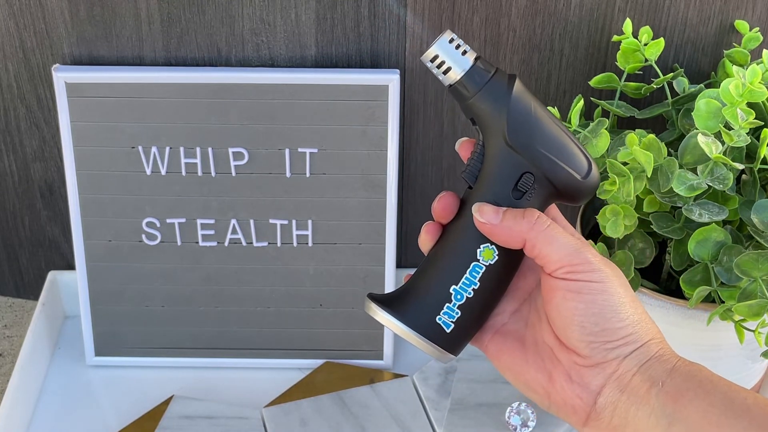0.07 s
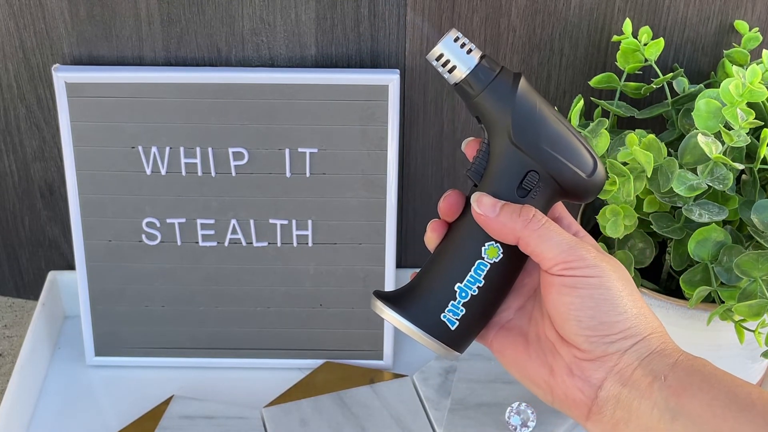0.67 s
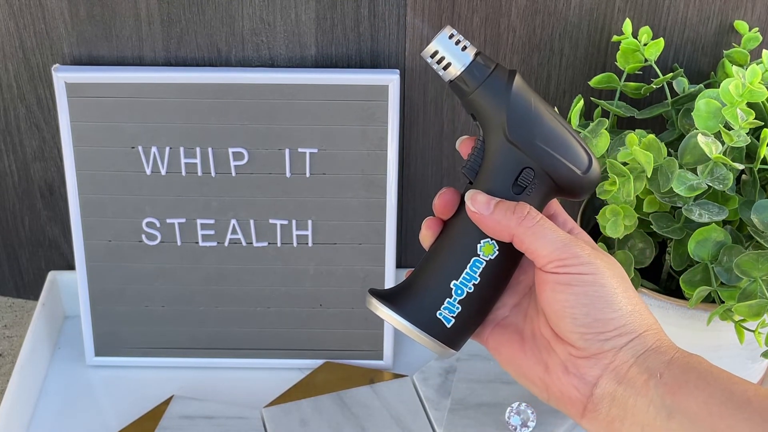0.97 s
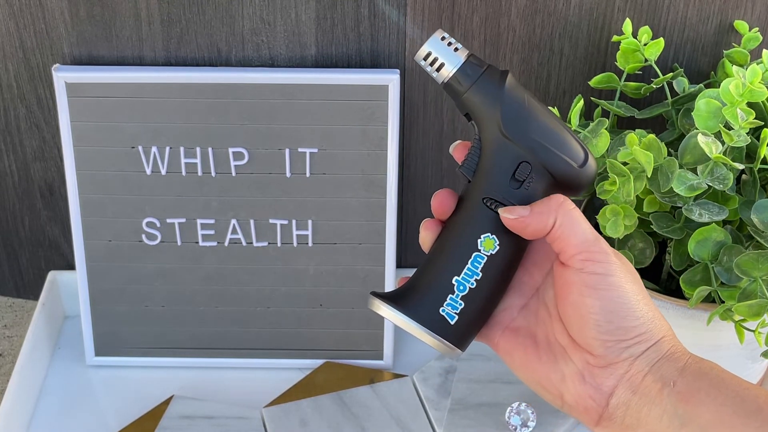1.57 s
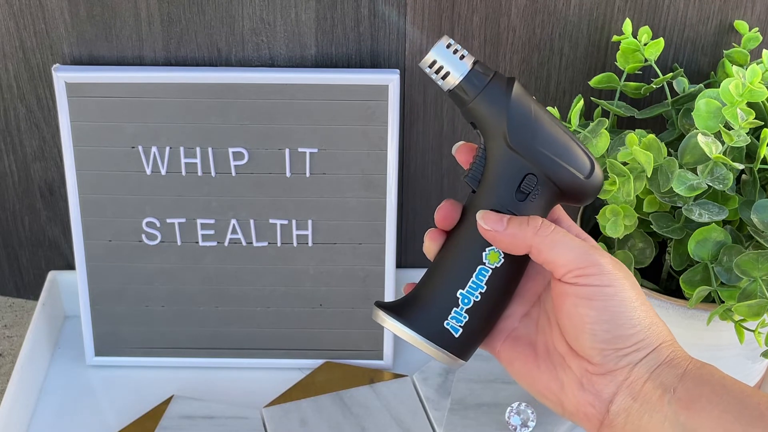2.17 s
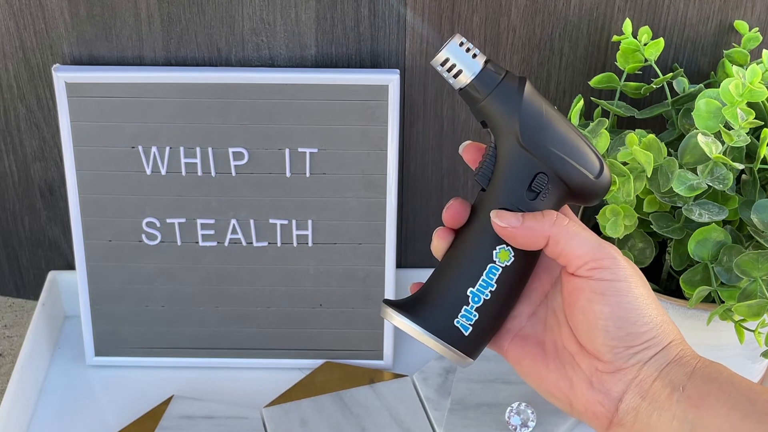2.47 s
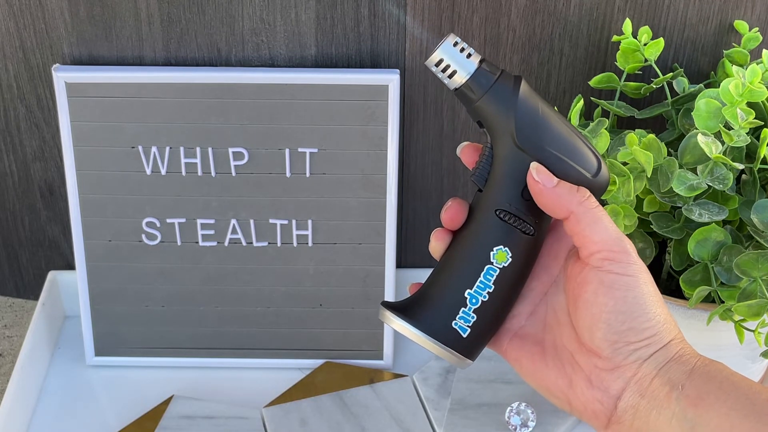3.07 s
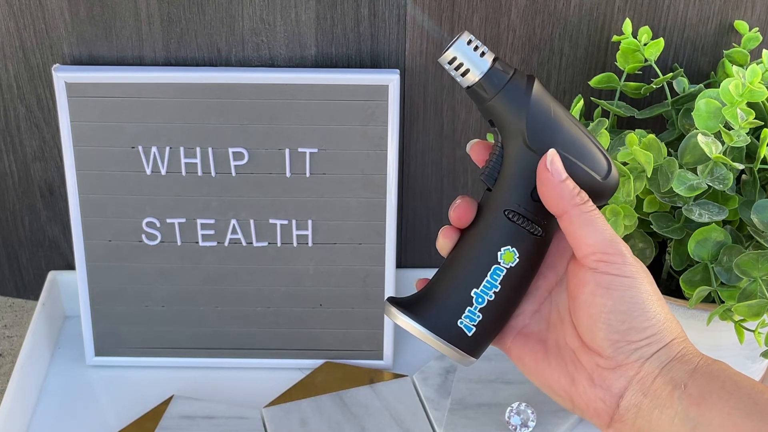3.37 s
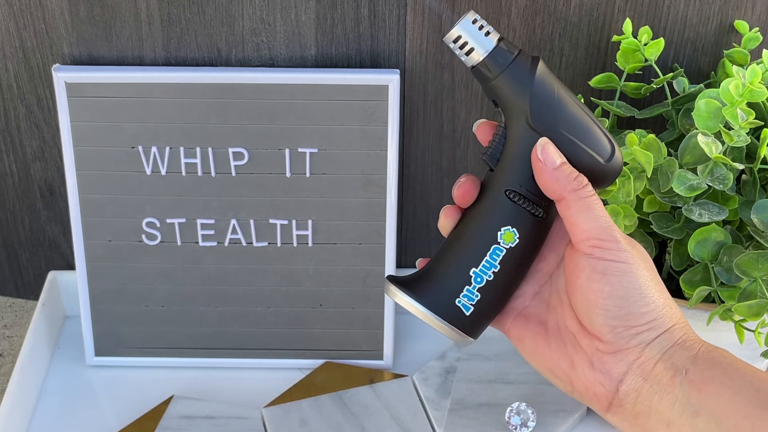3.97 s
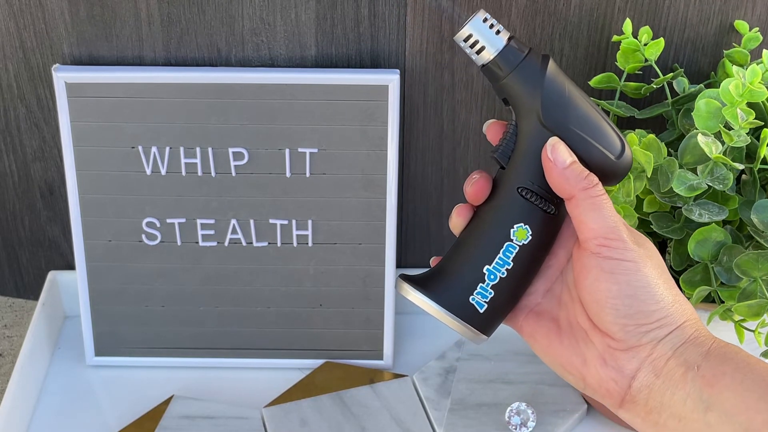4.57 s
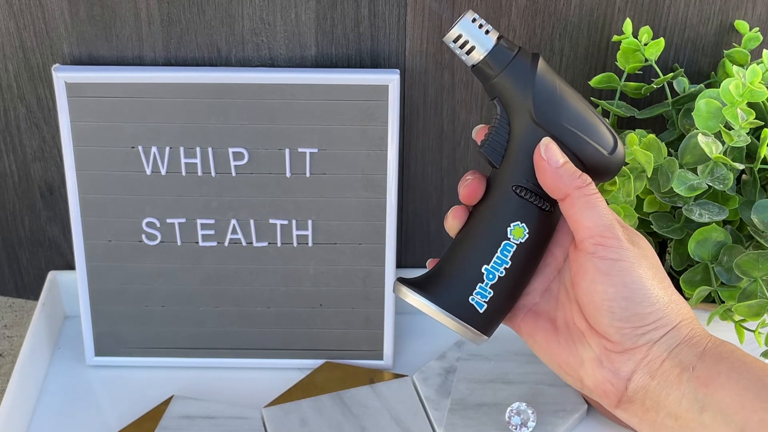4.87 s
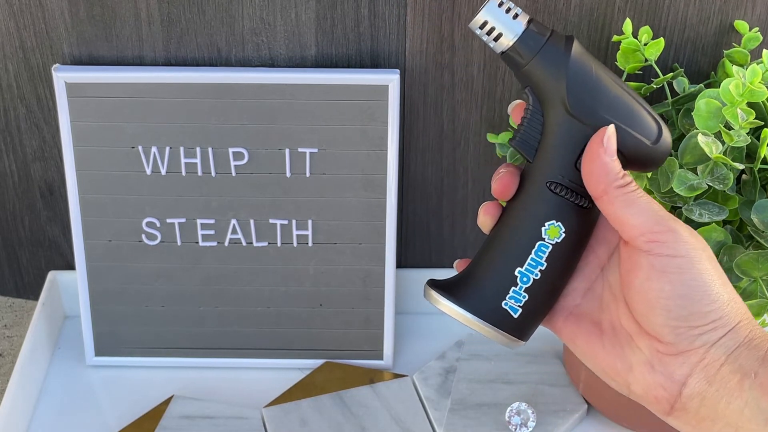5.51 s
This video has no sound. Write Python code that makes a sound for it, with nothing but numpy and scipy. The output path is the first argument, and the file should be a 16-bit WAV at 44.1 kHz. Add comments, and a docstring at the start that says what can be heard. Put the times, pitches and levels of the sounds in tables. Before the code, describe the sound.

A small butane torch is already burning close to the microphone, a steady hiss over a low flame roar with a thin, airy whistle. Early on the gas is eased down, then quickly opened again. The flame runs evenly for several seconds until the trigger snaps back with a sharp click and the hiss dies. A faint hum of a small room remains.

```python
"""A small butane torch burns close by, in front of a letter board and a wall: its turbulent jet
hisses, its flame roars and its nozzle whistles. The gas is eased down, then quickly opened again,
and as the hand moves, reflections from the nearby surfaces sweep a comb through the sound.
Near 4.9 s the trigger snaps back and rings the housing; the flame dies and the last gas blows
through the burner tube. Fingers shift on the housing, and a quiet room hum remains."""
import sys
import numpy as np
from scipy import signal
from scipy.fft import rfft, irfft, next_fast_len
from scipy.io import wavfile
from scipy.ndimage import map_coordinates

SR = 44100
rng = np.random.default_rng(int(sys.argv[2]) if len(sys.argv) > 2 else 0)


def inscribe(sig):
    """Save sig as 16-bit PCM at rate SR to the path in sys.argv[1].

    A 1-D sig is mono; a 2-D sig holds one channel per row.
    Samples are clipped to [-1, 1] before scaling.
    """
    pcm = np.round(np.clip(np.atleast_2d(sig).T, -1, 1) * 32767)
    wavfile.write(sys.argv[1], SR, pcm.astype(np.int16))


N = 244293
TIME = np.arange(N) / SR
RELEASE_S, EMPTY_S = 4.868, 4.995  # the valve shuts; the last gas has left the nozzle

# spectrum of the gas jet's hiss: f/Hz, spectral level/dB
HISS_SPECTRUM = [(100.0, -15.5), (350.0, -9), (700.0, -7.5), (1500.0, 2), (2500.0, -1.5), (4200.0, -6),
                 (5500.0, -12), (7000.0, -9.5), (9500.0, -19.5), (12000.0, -24.0), (15600.0, -31.5),
                 (16200.0, -47.5)]
# paths by way of board, tray and wall: delay at rest/ms, delay per sideways shift/(ms/cm),
# delay per upward shift/(ms/cm), gain for the flame, gain for the jet
ECHO_PATHS = [(0.672, 0.038, -0.008, 0.232, 0.26), (1.461, 0.024, -0.116, -0.04, 0.112),
              (1.785, 0.023, 0.022, -0.19, -0.17), (2.119, 0.044, 0.016, -0.227, -0.015),
              (0.576, -0.039, -0.031, 0.024, -0.1), (1.14, 0.012, 0.045, -0.037, 0.14)]


def torch():
    """Flow-driven sound: roar, hiss and whistles follow the gas flow and fade as the pressure falls."""
    # gas flow, eased down and then opened: t/s, level re full flow/dB
    gas_flow = [(0, -0.5), (.46, -3.5), (.505, -8.5), (.7, -11), (.95, -17.5), (1.21, -20), (1.243, -6.5),
                (1.3, -1.5)]
    flow_db, = curves(gas_flow)
    burner_lag_s = 0.0098  # the burner follows the nozzle a little late
    burner_db = np.interp(TIME - burner_lag_s, TIME, flow_db)
    shut_s = np.maximum(TIME - RELEASE_S, 0)  # time since the valve shut
    flutter = wobble(35)  # flame and jet waver together
    flame = flame_roar(burner_db, flutter, shut_s)
    jet = gas_jet(flow_db, burner_db, flutter, shut_s)
    whistles = amp(-260 * shut_s) * nozzle_whistles(flow_db)
    gas_left = np.clip((EMPTY_S - TIME) / 0.008, 0, 1)
    return gas_left * (flame + jet + whistles)


def flame_roar(burner_db, flutter, shut_s):
    """Turbulent combustion radiates a low roar, its amplitude nearly proportional to the flow."""
    # the roar: f/Hz, spectral level/dB
    roar_spectrum = [(25, -26.5), (60, -0.1), (120, 0.5), (200, -1.5), (310, -2.2), (420, 1.2), (700, -6.5),
                     (1500, -7.5), (2500, -14.5), (4200, -38.5), (9000, -48)]
    roar = amp(-36 + 1.04 * burner_db + 0.85 * flutter - 180 * shut_s) * turbulence(roar_spectrum)
    *_, flame_gains, _ = np.transpose(ECHO_PATHS)
    return reflected(roar, flame_gains)


def gas_jet(flow_db, burner_db, flutter, shut_s):
    """Jet turbulence radiates a broad hiss and a treble sizzle that grows more steeply with flow."""
    # the nozzle's sizzle: f/Hz, spectral level/dB
    sizzle_spectrum = [(3000.0, -24), (5500.0, -17), (7000.0, -0.5), (9500.0, -4.5), (11500.0, -1),
                       (13500.0, 4.9), (15600.0, -10.5), (16200.0, -34.5)]
    hiss = amp(-43 + 0.3 * burner_db + 0.93 * flutter - 380 * shut_s) * turbulence(HISS_SPECTRUM)
    sizzle = amp(-52 + 1.2 * flow_db + 0.25 * flutter - 260 * shut_s) * turbulence(sizzle_spectrum)
    *_, jet_gains = np.transpose(ECHO_PATHS)
    return reflected(hiss + sizzle, jet_gains)


def nozzle_whistles(flow_db):
    """Aerodynamic tones: two airy whistles grow with the flow, and fade or swell now and then."""
    # drift of the upper whistle: t/s, f/Hz
    upper_pitch = [(.6, 11560), (1.25, 11200), (1.85, 11050), (2.05, 11550), (3.4, 11320), (4.6, 11760)]
    # fades and swells of the lower whistle: centre t/s, half length/s, gain/dB
    swells = [(1.604, .3, -3.5), (2.16, 0.19, 7), (3.35, 0.58, 6)]
    upper_hz, = curves(upper_pitch)
    swell_db = sum(db * swell(s, half_s) for s, half_s, db in swells)
    upper = amp(-54 + 1.2 * flow_db + 0.28 * swell_db) * narrow_noise(upper_hz, width_hz=290)
    lower = amp(-55.5 + 0.26 * flow_db + swell_db) * narrow_noise(7040, width_hz=120)
    return upper + lower


def last_gas():
    """Pipe resonance: as the flame dies, the remaining gas hisses hollowly through the burner tube."""
    # resonances of the empty tube: f/Hz, half width/Hz, level/dB
    tube_modes = [(1434, 82, -53.5), (4100, 72, -64)]
    onset = np.clip((TIME - RELEASE_S) / 0.025, 0, 1)
    gas_left = np.clip((EMPTY_S - TIME) / 0.006, 0, 1)
    hollow = sum(amp(db) * narrow_noise(hz, width_hz) for hz, width_hz, db in tube_modes)
    return onset * gas_left * (hollow + amp(-58.5) * turbulence(HISS_SPECTRUM))


def trigger():
    """Impact excitation: the sprung trigger slides off its catch and slams home."""
    # contacts within the snap: t/s, level/dB, gain of the crack
    contacts = [(4.8655, -21, 2.8), (4.867, -7, .22)]
    snap = np.zeros(N + SR)
    for s, db, crack_gain in contacts:
        hit = amp(db) * housing_knock(crack_gain)
        snap[round(s * SR):][:len(hit)] += hit
    radiation = signal.butter(4, 780, "high", fs=SR, output="sos")  # so small a body radiates no bass
    return signal.sosfilt(radiation, snap[:N])


def housing_knock(crack_gain):
    """Free vibration: one contact rings the housing's damped modes and gives off a bright crack."""
    # modes of the housing: f/Hz, relative level/dB, T60/s
    modes = [(958, -5, 0.026), (1112, -5, 0.02), (1347, -9.5, .019), (1599, -10.5, 0.018), (2213, -7, .015),
             (2490, -5.5, 0.026), (3060, -6.5, .017), (3550, -3, 0.018), (3780, -8, .016),
             (4090, -2.5, 0.022), (4500, -11, .014), (4818, -7.5, 0.027), (4990, -4.5, 0.031),
             (5735, -2.5, .02), (6236, -11.5, 0.024), (6576, -8.5, .018), (6950, -4.5, 0.024),
             (7224, -9, 0.024), (7663, -4, 0.021), (8100, -8, .016), (9805, -13.5, .015),
             (10948, -14, .015), (11837, -16.5, .016), (12876, -15, .016)]
    rise_s, crack_t60_s = 0.001, 0.022
    t = np.arange(SR // 10) / SR
    # neighbouring modes start in opposite sense
    ring = sum((-1) ** k * amp(db - 60 * t / t60) * np.sin(2 * np.pi * hz * t)
               for k, (hz, db, t60) in enumerate(modes))
    crack_band = signal.butter(2, [1600, 13000], "band", fs=SR, output="sos")
    crack = amp(-60 * t / crack_t60_s) * signal.sosfilt(crack_band, rng.standard_normal(len(t)))
    return ring * (1 - np.exp(-t / rise_s)) + crack_gain * crack


def radiated_snap():
    """Total radiation: summed over all directions, the snap is a smooth pulse that excites the room."""
    # the snap over all directions: f/Hz, spectral level/dB
    snap_spectrum = [(300, -32), (700, -19.5), (1000, -5.5), (2500, -4.5), (5000, -5.5), (7000, -7.5),
                     (9000, -14), (13000, -12), (16000, -26)]
    impulse = np.zeros(N)
    impulse[round(RELEASE_S * SR)] = 1
    return amp(4) * shaped(impulse, snap_spectrum)


def fingers():
    """Adhesion and friction: a fingertip comes unstuck with a tick, then the loosening grip rubs."""
    # slides on the housing: peak t/s, half length/s, level/dB
    rubs = [(5.348, .035, -75), (5.418, .006, -74), (5.522, .035, -77.5)]
    # skin rubbing on plastic: f/Hz, spectral level/dB
    skin_spectrum = [(300, -6), (2200, 1), (3300, -11.5), (5400, -8), (7500, -20), (14000, -29)]
    tick_s, tick_t60_s = 5.329, 0.03
    age = TIME - tick_s
    tick = (age > 0) * amp(-69 - 60 * np.abs(age) / tick_t60_s) * narrow_noise(5220, width_hz=730)
    sliding = sum(amp(db) * swell(s, half_s) for s, half_s, db in rubs)
    roughness = amp(1.5 * wobble(110))
    return tick + sliding * roughness * coloured_noise(skin_spectrum)


def reflected(x, gains):
    """Interference with close reflections makes a comb filter that slides as the torch moves."""
    # position of the hand: t/s, sideways/cm, upward/cm
    hand_path = [(0.25, 0.2, 0.37), (0.6, -0.2, 0.06), (1.19, -0.1, 0.09), (1.3, -3.5, 0.35),
                 (1.87, -2.5, 0.17), (2.08, 0.1, 0.26), (2.9, 0.74, 0.32), (3.7, 1.4, 0.12),
                 (4.15, -0.15, 2.18), (4.75, 0.4, 2.19)]
    sideways, upward = curves(hand_path)
    delays_ms = [rest + per_side * sideways + per_up * upward for rest, per_side, per_up, *_ in ECHO_PATHS]
    echoes = [map_coordinates(x, [np.arange(N) - ms * SR / 1000], order=3) for ms in delays_ms]
    return x + sum(gain * echo for gain, echo in zip(gains, echoes))


def scattered(x):
    """Scattering by nearby things: a spray of tiny echoes, in antiphase at the two microphone ports."""
    # scattered sound: f/Hz, level re direct sound/dB
    scatter_spectrum = [(150, -26), (600, -21), (1030, -12.5), (1400, -24.5), (2600, -23), (4500, -37.5),
                        (6300, -15), (9700, -14), (11400, -18.5), (13500, -16)]
    t60_s = 0.083
    t = np.arange(SR // 10) / SR
    spray = rng.standard_normal(len(t)) * amp(-60 * t / t60_s)
    echoes = signal.fftconvolve(x, spray / np.linalg.norm(spray))[:N]
    return np.array([[1], [-1]]) * shaped(echoes, scatter_spectrum)


def room(x):
    """Reverberation: a small room's tail decays exponentially, partly coherent at the two ports."""
    # reverberation time: f/Hz, T60/s
    decay_times = [(150, 0.25), (1000, .44), (4000, 0.36), (8000, 0.31), (15000, .22)]
    hz, t, bands = signal.stft(rng.standard_normal((3, SR // 2)), SR, nperseg=256)
    decay = amp(-60 * t / along(decay_times, hz)[:, None])
    _, tails = signal.istft(bands * decay, SR, nperseg=256)
    pair = tails[0] + 0.9 * tails[1:]  # one common tail, plus one for each port
    delayed = np.pad(x, (180, 0))  # the tail starts 4 ms late
    return signal.fftconvolve(delayed[None], pair / np.linalg.norm(pair[0]), axes=1)[:, :N]


def background():
    """Ambient noise: a low room rumble under an appliance hum whose phases wander slightly."""
    # the rumble: f/Hz, spectral level/dB
    rumble_spectrum = [(25, -16), (55, -2), (100, -4.5), (140, -2.5), (200, -17), (350, -21), (520, -28),
                       (1200, -41.5), (2000, -42.5), (3500, -50), (6000, -52), (10000, -60.5), (16000, -70)]
    # partials of the hum: f/Hz, rms level/dB
    partials = [(54, -67), (120, -57.5), (144, -63), (355, -73)]
    common, left, right = [coloured_noise(rumble_spectrum) for _ in range(3)]
    hum = sum(amp(db) * np.sqrt(2) * np.sin(2 * np.pi * hz * TIME + 0.37 * wobble(4))
              for hz, db in partials)
    return amp(-53) * (common + 0.18 * np.array([left, right])) + hum


def turbulence(spectrum):
    """Source and filter: flow noise of rms 1, coloured by the surfaces around the torch."""
    # steady peaks and dips among board, tray and wall: f/Hz, half width/Hz, gain/dB
    colouration = [(305, 54, 3.2), (438, 51, -6.8), (612, 85, 10.4), (727, 76, 5.6), (835, 24, -4),
                   (893, 27, 4), (1070, 140, -4.6), (1351, 64, 3.2), (1550, 46, 4.5), (1729, 78, -5.8),
                   (2063, 92, 3), (2330, 170, -5.4), (2497, 58, 4), (2880, 111, -3.5), (3037, 60, 1.5),
                   (3430, 64, -5), (3545, 55, 2), (3798, 150, -4), (4503, 290, 1.9), (4566, 67, -4.4),
                   (4815, 70, 1.5), (4994, 83, 4), (5560, 150, -4.5), (6093, 178, 1.6), (9446, 181, 3.3),
                   (10599, 166, 3), (12705, 359, 4.5)]

    def response(hz):
        """The source spectrum and the bell-shaped peaks and dips add in decibels."""
        bumps_db = sum(db * np.exp(-((hz - centre) / width) ** 2) for centre, width, db in colouration)
        return amp(along(spectrum, hz) + bumps_db)

    return unit(filtered(rng.standard_normal(N), response))


def narrow_noise(hz, width_hz):
    """Quadrature modulation centres a noise band of rms 1 on a steady or moving pitch."""
    a, b = filtered(rng.standard_normal((2, N)), lambda f: 1 / (1 + (f / width_hz) ** 2))
    phase = 2 * np.pi * np.cumsum(hz * np.ones(N)) / SR
    return unit(a * np.cos(phase) + b * np.sin(phase))


def coloured_noise(spectrum):
    """White noise filtered to a spectrum, at rms 1."""
    return unit(shaped(rng.standard_normal(N), spectrum))


def shaped(x, spectrum):
    """Zero-phase filtering by a curve of points (f/Hz, gain/dB)."""
    return filtered(x, lambda hz: amp(along(spectrum, hz)))


def filtered(x, response):
    """Linear filtering: the spectrum of x times a frequency response."""
    size = next_fast_len(N + SR // 2)
    return irfft(rfft(x, size) * response(np.fft.rfftfreq(size, 1 / SR)), size)[..., :N]


def along(points, hz):
    """Interpolation of points (f/Hz, value) on a logarithmic frequency axis."""
    f, values = np.transpose(points)
    return np.interp(np.log(hz + 1), np.log(f + 1), values)


def curves(rows):
    """Linear interpolation in time: one value per sample for each column after t/s."""
    times, *columns = np.transpose(rows)
    return [np.interp(TIME, times, column) for column in columns]


def wobble(rate):
    """Smooth random modulation: a spline through `rate` knots a second."""
    return map_coordinates(rng.standard_normal(int(N * rate / SR) + 4), [TIME * rate])


def swell(peak_s, half_s):
    """A Gaussian envelope, 1 at its peak and 1/e at half_s to either side."""
    return np.exp(-((TIME - peak_s) / half_s) ** 2)


def unit(x):
    """Normalisation to rms 1."""
    return x / np.sqrt(np.mean(x ** 2) + 1e-20)


def amp(db):
    """Amplitude ratio of a level in decibels."""
    return 10 ** (np.asarray(db) / 20)


def scene():
    """Superposition: torch and hand in the direct field, reverberation and hum behind them."""
    burning = torch() + last_gas()
    close = burning + scattered(burning) + trigger() + fingers()
    reverberation = room(amp(-21.5) * burning + radiated_snap())
    return close + reverberation + background()


def record(dry):
    """Stereo pickup: two ports differ in level and phase; peaks saturate softly and the band is limited."""
    # phase between the ports: f/Hz, lead of left over right/rad
    port_phase = [(500, 0), (900, .35), (980, 1.4), (1030, -1.5), (1250, -.4), (1480, 0), (1730, -.7),
                  (1790, 1.2), (1900, .2), (2150, 0), (2760, .25), (3400, 0), (5700, 0), (7000, -1.2),
                  (7800, -3), (8400, -3.2), (11100, -6.2), (12000, -6.35), (14500, -9.2), (16000, -9.5)]
    # balance of the ports: f/Hz, level of left re right/dB
    port_balance = [(140, 1), (330, -3), (490, -0.3), (640, -3), (850, 1.4), (940, 1.5), (1040, 7),
                    (1250, -1.8), (1620, 0.9), (1765, -12), (1900, -3.5), (2030, 3.4), (2400, 0),
                    (2850, 3.3), (3300, -1)]
    ceiling, cutoff_hz = 0.86, 16489
    side = np.array([[0.5], [-0.5]])
    ports = lambda hz: amp(side * along(port_balance, hz)) * np.exp(1j * side * along(port_phase, hz))
    picked_up = filtered(dry, ports)
    rounded = picked_up / (1 + np.abs(picked_up / ceiling) ** 6) ** (1 / 6)
    return filtered(rounded, lambda hz: hz < cutoff_hz)


dry = scene()
out = record(dry)
inscribe(out)
```